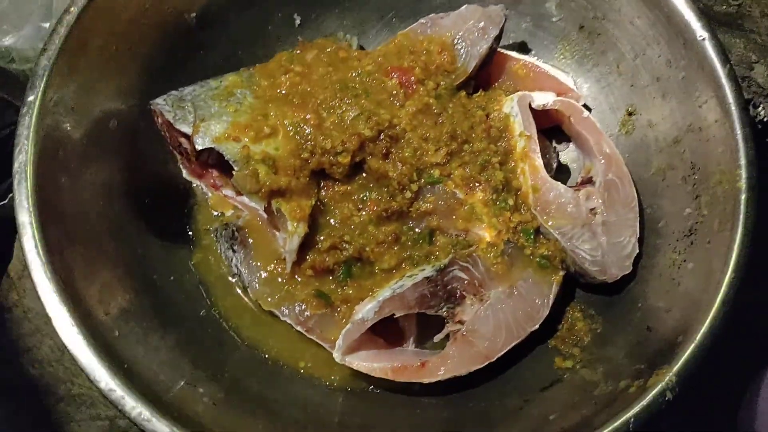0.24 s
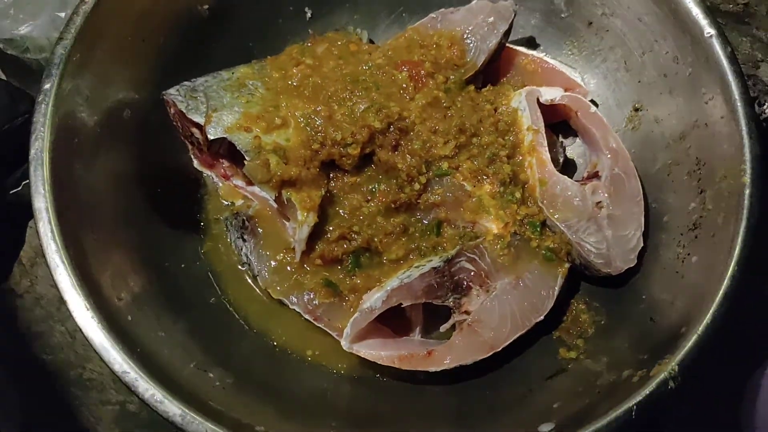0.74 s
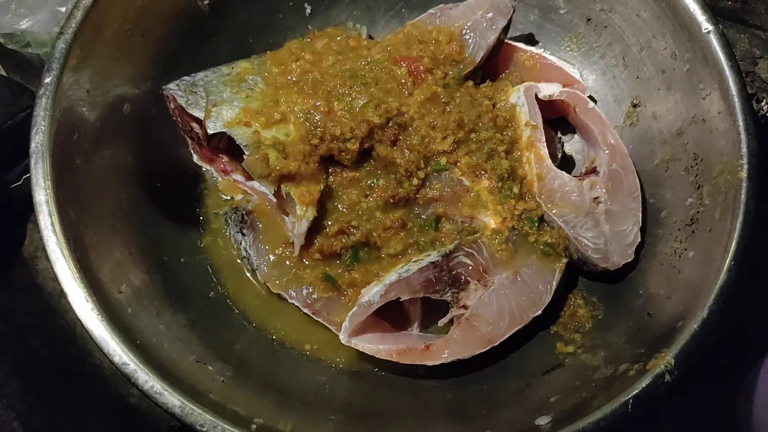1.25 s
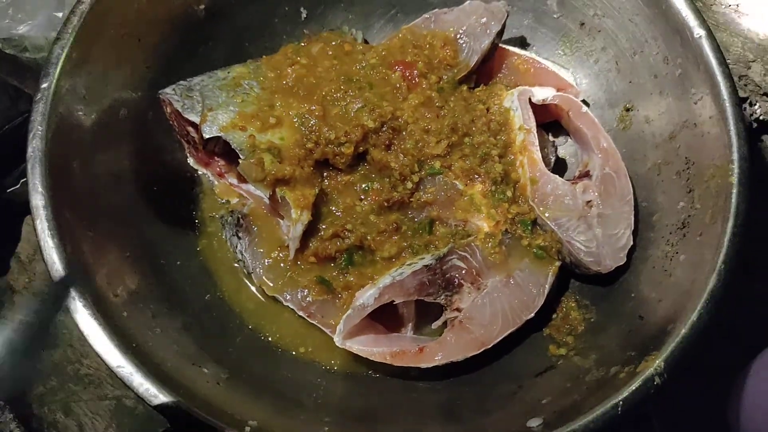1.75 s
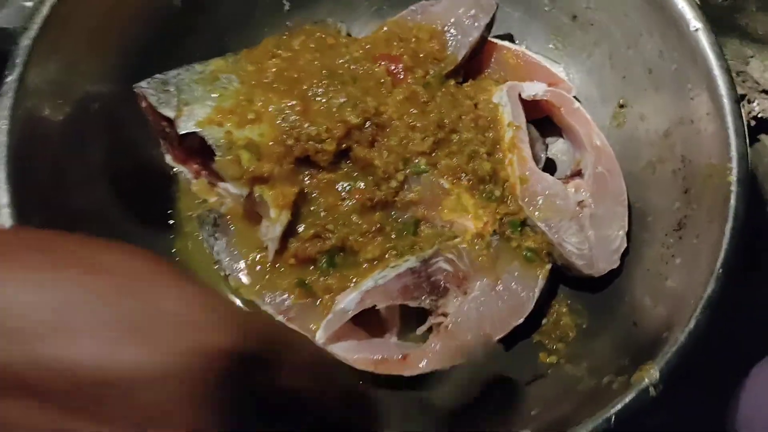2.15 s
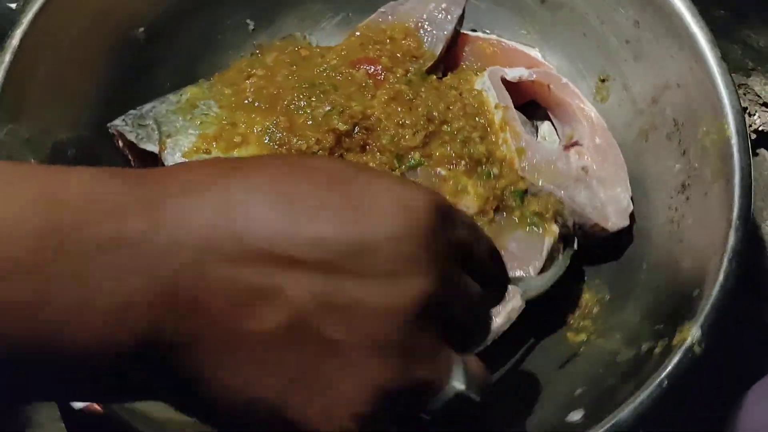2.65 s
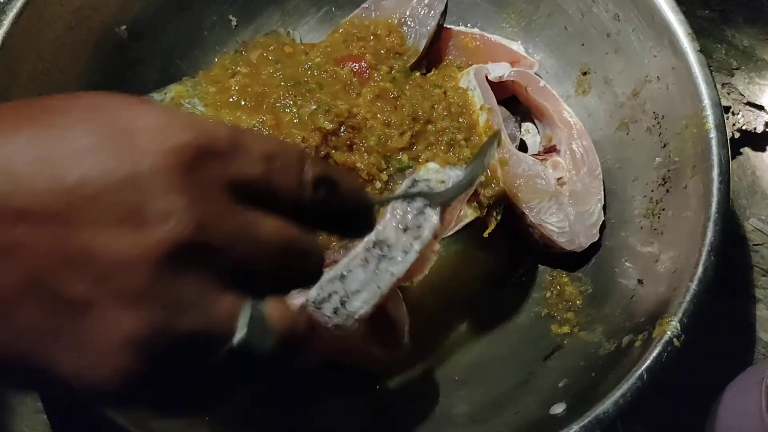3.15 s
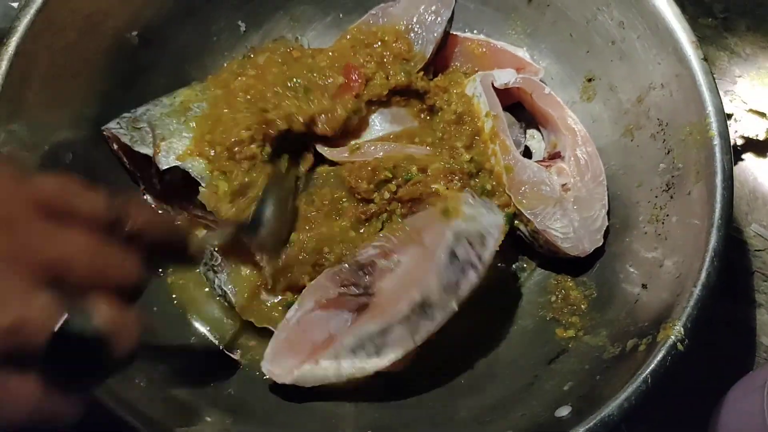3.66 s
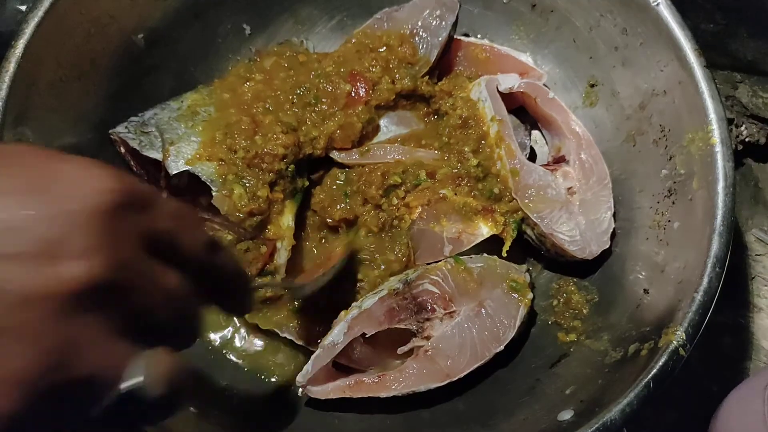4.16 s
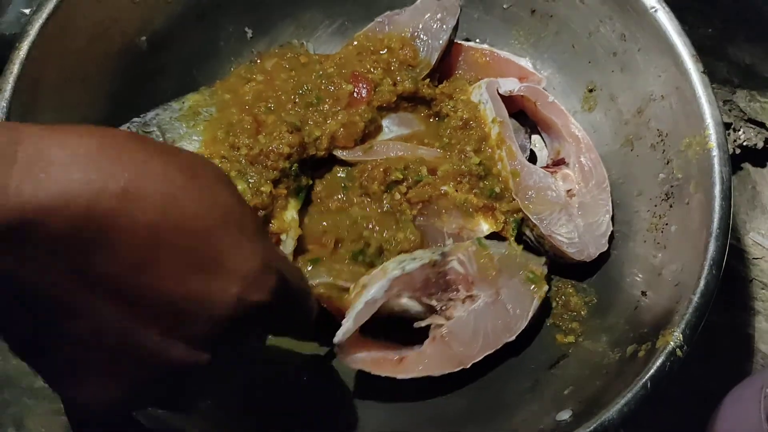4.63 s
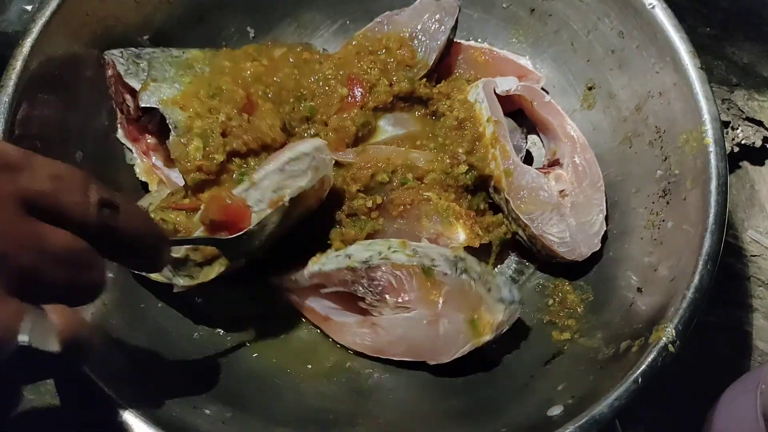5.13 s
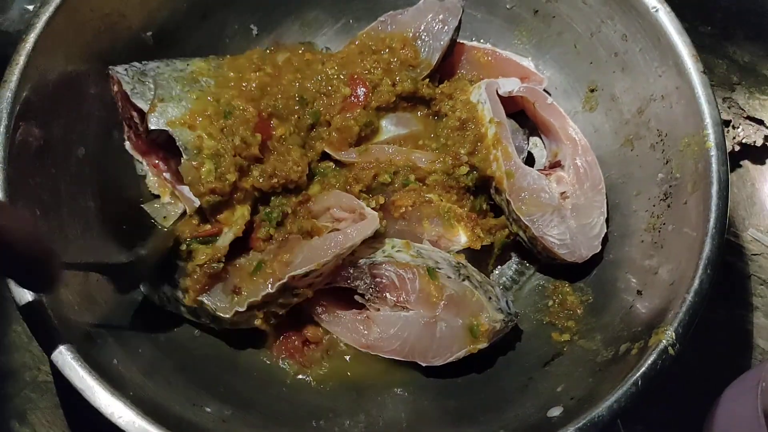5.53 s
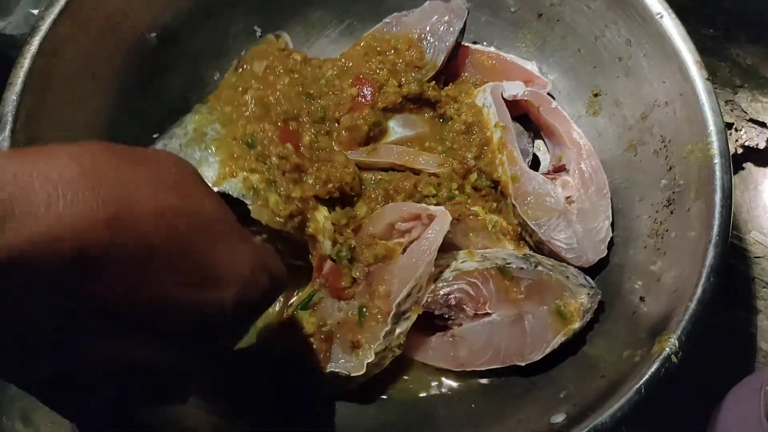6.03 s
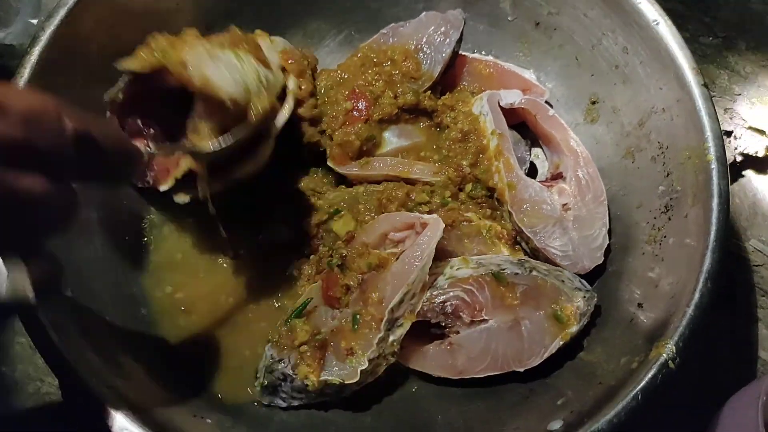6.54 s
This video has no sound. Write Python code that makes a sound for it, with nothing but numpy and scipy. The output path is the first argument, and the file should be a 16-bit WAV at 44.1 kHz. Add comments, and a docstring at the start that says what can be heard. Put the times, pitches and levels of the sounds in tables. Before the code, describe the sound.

A hand-held microphone picks up low muffled bumps and dragging skin, with wet rubbing behind. At about two seconds a spoon knocks sharply on a steel bowl, then slippery slices are turned with squelches, tiny pops and scattered short metallic clanks. Slices settle softly; a loud wet smack comes near the end. Faint outdoor hiss stays underneath.

```python
"""A steel spoon turns fish in wet spice paste inside a steel bowl, close to a hand-held camera outdoors.
Strokes hiss and smack through the paste from the start, over a soft steady outdoor hiss; in the first two
seconds skin drags on the camera and fingers bump it. Then the spoon knocks on the bowl, whose ringing modes
the fish damps, and later slices settle softly. Sticky contacts are noise and snaps; wet pops are rising sines."""
import sys
import numpy as np
from scipy import signal
from scipy.fft import rfft, irfft, next_fast_len
from scipy.io import wavfile
from scipy.ndimage import uniform_filter1d, map_coordinates

SR = 44100
rng = np.random.default_rng(int(sys.argv[2]) if len(sys.argv) > 2 else 0)


def dump(signal):
    """Clip the signal to [-1, 1] and save it as 16-bit WAV at the path in sys.argv[1]."""
    limited = np.clip(np.atleast_2d(signal).T, -1, 1)
    pcm = np.round(limited * 32767).astype(np.int16)
    wavfile.write(sys.argv[1], SR, pcm)


N = 299439  # length in samples

# Levels in the tables are relative: each source sets its final loudness and tone in its function.

# Spoon hitting the bowl: start_s, middle_db, favoured_pitch_hz, low_over_middle_db, high_over_middle_db,
# freedom (share of the bowl's free ring time)
KNOCKS = [(2.0678, -19.5, 1106, 8, 2.5, 0.37), (2.0977, -29, 1190, -20, 3.5, 0.43),
          (2.108, -25, 1960, -7, 5.5, 0.35), (2.154, -37.5, 2110, -35.5, 5.5, 0.49),
          (3.0908, -36, 1980, -47, 5.5, 0.64), (3.6161, -30.5, 2070, -6, -1.5, 0.54),
          (3.666, -33, 1480, -14.5, -1.5, 0.36), (4.1651, -24, 798, 6, 8, 0.72),
          (5.466, -24.5, 1550, -5.5, -2.5, 0.19), (6.5603, -35, 2150, -25.5, 2, 1),
          (6.753, -38, 2300, -4, 11, 0.27)]
# Ringing modes of the loaded bowl: pitch_hz, level_db, ring_s (time to fall 60 dB, before freedom shortens it)
BOWL_MODES = [(608, -16, 0.34), (787, -10.5, 0.081), (923, -3.5, 0.1), (1034, -3.5, 0.041),
              (1195, -13, 0.3), (1280, -3, 0.075), (1486, -4.5, 0.025), (1660, -10.5, 0.11),
              (1978, -3.5, 0.043), (2130, -5.5, 0.097), (2397, -5.5, 0.05), (2570, -7, 0.06),
              (3437, -9.5, 0.033), (3990, -10, 0.017), (4690, -6, 0.09), (4915, -6, 0.06),
              (5500, -7, 0.045), (5800, -9, 0.06), (6220, -5.5, 0.047), (6430, -5.5, 0.06),
              (6710, -12, 0.12)]
# Tone of the heavy bowl giving way under a knock: pitch_hz, level_db
BOWL_THUD = [(60, -17.5), (170, -7.5), (320, 3), (450, -2), (700, -23)]


def spoon():
    """Each knock clacks and rings the bowl; its spot favours some modes, and fish there damps and blurs them."""
    out = np.zeros(N)
    t = np.arange(SR // 3) / SR
    hz, mode_db, ring_s = np.transpose(BOWL_MODES)[:, :, None]
    for start_s, middle_db, favoured_hz, low_db, high_db, freedom in KNOCKS:
        # Modes near the favoured pitch are up to 7 dB stronger, with some random scatter.
        scatter_db = rng.normal(0, 2.5, hz.shape)
        spot_db = 7 * np.exp(-(np.log(hz / favoured_hz) / 0.34) ** 2) + scatter_db
        # A random drift of phase makes each mode less pure.
        drift = np.cumsum(rng.standard_normal((len(hz), len(t))), axis=1)
        blur = drift * np.sqrt(hz / SR) * 0.012
        waves = np.sin(2 * np.pi * (hz * t + blur + rng.random(hz.shape)))
        fading = burst(t, 0.0014, 0.0057, ring_s * np.clip(freedom, 0.1, 1))
        ring = unit((amp(mode_db + spot_db) * waves * fading).sum(0))

        hard = clack(t, count=70)
        noise = unit(colour(rng.standard_normal(len(t)), CONTACT_TONE))
        contact = unit((hard + amp(-4) * noise) * burst(t, 0.0006, 0.0071, 0.045))
        levels_db = middle_db + np.array([low_db, 0, high_db])
        knock = voiced(ring + amp(-5) * contact, levels_db)

        thud = unit(colour(rng.standard_normal(len(t)), BOWL_THUD)) * burst(t, 0.0015, 0.004, 0.23)
        thud_db = middle_db + low_db - 25.5  # set from the knock's low register
        add(out, start_s, amp(-12.5) * (knock + amp(thud_db) * thud))
    return colour(out, [(60, -22.5), (200, 1.5), (350, -1.5), (1000, 0)])


# Tone of hard or sticky contacts, shared by knocks and smacks: pitch_hz, level_db
CONTACT_TONE = [(100, -67), (300, -9.5), (600, -3.5), (1100, -7.5), (2200, 1.5), (3000, -0.5), (5000, -5),
                (7000, 7), (8200, -14)]


def clack(t, count):
    """Many partials of uneven strength, drawn anew for every contact."""
    hz = rng.uniform(np.sqrt(350), np.sqrt(8000), (count, 1)) ** 2
    size = shape(CONTACT_TONE, hz) * hz ** 0.25 * amp(rng.normal(0, 3, hz.shape))
    waves = np.sin(2 * np.pi * (hz * t + rng.random(hz.shape)))
    return unit((size * waves).sum(0))


STROKE_RANGE_DB = 20  # drop over one swell or fade time
# Spoon strokes through the paste: firmest_push_s, level_db, swell_s, fade_s, hiss_over_body_db
STROKES = [(0.01, -65, 0.09, 0.45, 7.5), (0.62, -44, 0.23, 0.19, 1.5), (0.88, -43, 0.16, 0.17, 1),
           (1.05, -47.5, 0.22, 0.3, -0.5), (1.4, -55.5, 0.16, 0.21, 7), (1.66, -64, 0.9, 0.95, -28.5),
           (2.01, -57, 0.25, 0.6, -1), (2.191, -52, 0.12, 0.56, 3), (2.47, -57, 0.3, 0.49, -5),
           (2.822, -61, 0.23, 0.31, 6.5), (3.452, -60.5, 0.45, 0.1, -1), (3.65, -56, 0.3, 0.57, 1),
           (4.09, -64.5, 0.077, 0.17, 7.5), (4.2, -47, 0.01, 0.28, 2.5), (4.38, -49, 0.25, 0.24, -31),
           (5.17, -56.5, 0.58, 0.72, 2.5), (5.5, -50.5, 0.067, 0.29, 1.5), (5.66, -49, 0.11, 0.21, 2.5),
           (5.85, -60.5, 0.6, 0.97, -9.5), (6.251, -66, 1, 0.74, 6.5), (6.64, -48.5, 0.04, 0.18, -11.5)]


def strokes():
    """Body and hiss level in dB: each stroke swells to its firmest push and fades by the stroke range."""
    t = np.arange(N) / SR
    body, hiss = np.full(N, 1e-10), np.full(N, 1e-10)
    for push_s, level_db, swell_s, fade_s, hiss_db in STROKES:
        distance = np.maximum((push_s - t) / swell_s, (t - push_s) / fade_s)
        power = amp(level_db - STROKE_RANGE_DB * np.minimum(distance, 10)) ** 2
        body += power
        hiss += power * amp(hiss_db) ** 2
    return 10 * np.log10(body), 10 * np.log10(hiss)


# The lows thin out in quiet moments: a lower edge moves up as the level falls.
EDGE_HZ, EDGE_AT_DB, EDGE_DB_PER_OCTAVE = 622, -59.5, 10
# Tone of wet rubbing as the bowl colours it: pitch_hz, level_db
PASTE_TONE = [(250, -8), (500, -6), (900, 2), (1250, -0.5), (1600, 2.5), (2300, 3), (3500, 1), (4400, -8),
              (5300, -7.5), (6100, -4.5), (6750, 1), (7150, -6), (7600, -11.5), (8400, -26)]


def sliding(body_db, hiss_db):
    """Sliding surfaces hiss with tiny sticky snaps and small bubbles; the lows thin out in quiet moments."""
    snaps = amp(2 * wobble(70)) * crackle(rate=700, spread_db=3)
    froth = bubbles(rate=200, centre_hz=1585, spread=0.79, cycles=18)
    grain = amp(1.8 * wobble(35))
    rub = grain * (rng.standard_normal(N) + amp(-6) * snaps) + amp(-10.5) * froth
    rub = unit(patchy(rub, depth_db=1.8))
    bowl_song = unit(singing(rng.standard_normal(N), width_hz=29))
    wet = colour(rub + amp(-16.5) * bowl_song, PASTE_TONE)

    # The body lies below the upper split; the hiss is what remains above it.
    body = filtered(wet, lambda hz: 1 / (1 + (hz / HIGH_SPLIT_HZ) ** 16))
    hiss = unit(wet - body)
    edge_hz = EDGE_HZ * 2 ** ((EDGE_AT_DB - body_db) / EDGE_DB_PER_OCTAVE)
    return amp(body_db + 1) * above_edge(unit(body), edge_hz) + amp(hiss_db - 2.23) * hiss


def bubbles(rate, centre_hz, spread, cycles):
    """Small air pockets open at random, rate a second; each rings for some cycles with a rising pitch."""
    count = int(rate * N / SR)
    hz = np.clip(centre_hz * np.exp(spread * rng.standard_normal((count, 1))), 250, 8000)
    size = amp(6.1 * np.minimum(rng.exponential(size=(count, 1)), 2.5))
    n = np.arange(SR // 25)
    age = hz * n / SR / cycles  # 1 when the bubble has fallen by 60 dB
    envelope = (1 - np.exp(-12 * age)) * amp(-60 * age)
    pops = size * envelope * np.sin(2 * np.pi * cycles * (age + 0.027 * age ** 2))
    starts = rng.integers(0, N, (count, 1))
    return unit(np.bincount((starts + n).ravel(), pops.ravel(), N)[:N])


def singing(x, width_hz):
    """The damped bowl answers a scrape at its own modes."""
    def response(f):
        total = 0
        for mode_hz, db, ring_s in BOWL_MODES:
            damping = 1j * f * width_hz
            total = total + amp(db) * np.sqrt(ring_s) * damping / (mode_hz ** 2 - f * f + damping)
        return total
    return filtered(x, response)


def above_edge(x, edge_hz):
    """Keep what lies above a moving lower edge."""
    hz, s, z = signal.stft(x, SR, nperseg=1024)
    edge = np.interp(s, np.arange(N) / SR, edge_hz)
    gain = 1 / (1 + (edge / (hz[:, None] + 1)) ** 7)
    return signal.istft(z * gain, SR, nperseg=1024)[1][:N]


def patchy(x, depth_db):
    """Random patches of gain over pitch and time make the rubbing hiss uneven."""
    z = signal.stft(x, SR, nperseg=512)[2]
    field = uniform_filter1d(rng.standard_normal(z.shape), size=6, axis=0)  # smooth over pitch
    field = uniform_filter1d(field, size=5, axis=1)  # smooth over time
    return signal.istft(z * amp(depth_db * unit(field)), SR, nperseg=512)[1][:N]


CAVITY_DB, CAVITY_PER_HIGH = -8, 0.45  # cavity over tearing; the duller the smack, the more it is a pure pop
# Low over middle: larger, lower-pitched cavities carry more of it.
LOW_DB, LOW_AT_HZ, LOW_DB_PER_OCTAVE = -14.5, 1436, 15
# Paste letting go of fish and spoon: start_s, middle_db, cavity_pitch_hz, high_over_middle_db
SMACKS = [(0.0648, -50.5, 1390, 7.5), (0.2668, -50, 2020, 5.5), (0.7627, -38.5, 2010, -15),
          (2.4788, -39, 1193, -16), (2.5272, -37, 1780, -5.5), (2.6244, -48.5, 1130, -16.5),
          (3.1193, -49, 1870, 6), (3.3492, -56.5, 1390, -19), (3.4284, -50, 1380, 11),
          (3.7599, -42.5, 985, 2), (3.8551, -48.5, 1790, 4.5), (3.8886, -47, 1330, -7),
          (4.37, -42, 2150, -14), (4.3894, -41.5, 1620, -0.5), (4.4887, -44, 2330, -16),
          (4.585, -43, 2130, -30), (4.7874, -50, 2750, 7), (4.8184, -41, 1764, -0.5),
          (4.8354, -40.5, 3200, -2), (4.9287, -58, 1610, 13.5), (5.1562, -37.5, 1225, -8),
          (5.231, -40.5, 1690, -5), (5.7204, -39, 1020, -1.5), (6.1464, -42, 960, -23),
          (6.153, -44.5, 2380, -28), (6.166, -41.5, 2850, -5), (6.2484, -59.5, 3120, 14.5),
          (6.5922, -36, 2265, -15), (6.6084, -27, 1780, -2), (6.6164, -23.5, 1140, -3.5),
          (6.6314, -48, 1400, 17.5), (6.6553, -35.5, 2050, -21), (6.7181, -40.5, 2160, -14)]


def smacks(body_db):
    """A wet film tears in a spray of snaps and opens a small, quivering cavity whose pitch rises."""
    out = np.zeros(N)
    t = np.arange(SR // 8) / SR
    for start_s, middle_db, cavity_hz, high_db in list(SMACKS) + small_smacks(body_db):
        cavity_db = CAVITY_DB - CAVITY_PER_HIGH * high_db
        low_db = LOW_DB - LOW_DB_PER_OCTAVE * np.log2(cavity_hz / LOW_AT_HZ)

        noise = rng.standard_normal(len(t))
        uneven = amp(11 * rng.standard_normal(len(t)))
        snaps = unit(colour(noise * uneven, CONTACT_TONE))
        tear = unit((amp(-5.5) * snaps + clack(t, count=45)) * burst(t, 0.003, 0.0035, 0.042))

        quiver = np.cumsum(rng.standard_normal(len(t))) * np.sqrt(cavity_hz / SR) * 0.055
        # The pitch starts a little under the cavity's own and rises; quiver is added in cycles.
        cycles = cavity_hz * (0.92 * t + 8 * t ** 2) + quiver
        pop = unit(np.sin(2 * np.pi * cycles) * burst(t, 0.0015, 0.00083, 0.016))

        levels_db = middle_db + np.array([low_db, 0, high_db])
        add(out, start_s, amp(-11) * voiced(tear + amp(cavity_db) * pop, levels_db))
    return colour(out, [(100, -25), (300, -17), (700, 7), (2000, -1.5)])


SMALL_RATE = 6  # small smacks a second
SMALL_OVER_DB, SMALL_FOLLOWS = 6, 0.44  # dB over the mean stroke; share of stroke level changes followed
SMALL_HZ, SMALL_HIGH_DB = 1800, -11  # middle of the random cavity pitch and of high over middle


def small_smacks(body_db):
    """Faint smacks at random moments, stronger where the stroke is firm."""
    chance = rng.random((N // 1000, 4))[:int(SMALL_RATE * N / SR)]
    mean_db = body_db.mean()
    level_db = mean_db + SMALL_OVER_DB + SMALL_FOLLOWS * (body_db - mean_db)
    events = []
    for when, size, pitch, bright in chance:
        middle_db = level_db[int(when * N)] + 6 * (size - 0.5)
        cavity_hz = SMALL_HZ * 2 ** (1.5 * (pitch - 0.5))
        high_db = SMALL_HIGH_DB + 24 * (bright - 0.5)
        events.append((when * N / SR, middle_db, cavity_hz, high_db))
    return events


RUB_RISE_S, RUB_T60_S = 0.029, 0.54  # the skin takes hold, then comes to rest
# Skin dragging on the camera: start_s, length_s, level_db
RUBS = [(0.532, 0.098, -43.5), (0.781, 0.16, -45.5), (0.89, 0.024, -47), (0.965, 0.061, -44.5),
        (1.066, 0.031, -41), (1.23, 0.17, -55.5), (1.555, 0.27, -49.5), (1.885, 0.044, -69),
        (2.032, 0.013, -51.5)]
# Fingers bumping the camera: start_s, low_db, thud_pitch_hz, middle_over_low_db, high_over_low_db
BUMPS = [(0.547, -25.5, 307, 3, -12.5), (0.575, -26.5, 277, -14, -29), (0.901, -17, 212, -6.5, -21),
         (0.917, -23, 170, -9, -35), (1.014, -28, 182, -10.5, -23.5), (1.05, -32.5, 285, -2, 0),
         (1.114, -26.5, 266, -19, -17.5), (1.324, -45, 270, -8.5, -9), (1.815, -36.5, 314, -28, -20.5)]


def grip():
    """Skin sticks and slips on the camera; fingers bump it with a sagging thud and a scuff."""
    drag_power = np.zeros(N)
    t = np.arange(SR) / SR
    for start_s, length_s, level_db in RUBS:
        add(drag_power, start_s, (amp(level_db) * burst(t, RUB_RISE_S, length_s, RUB_T60_S)) ** 2)
    lumps = amp(2.6 * wobble(45))
    stick_slip = case(crackle(rate=350, spread_db=-0.5), ring=2.2)
    out = np.sqrt(drag_power) * lumps * amp(1) * stick_slip

    t = np.arange(SR // 4) / SR
    for start_s, low_db, thud_hz, middle_db, high_db in BUMPS:
        sag = np.sin(2 * np.pi * thud_hz * (t - 1.4 * t ** 2))  # pitch falls from thud_hz
        thud = case(rng.standard_normal(len(t)), ring=3.2) + amp(-4) * sag
        thud = thud * burst(t, 0.0005, 0.015, 0.063)
        scuff = unit(clack(t, count=120) * amp(3.3 * wobble(500)[:len(t)]))
        scuff = scuff * burst(t, 0.00037, 0.0031, 0.073)
        levels_db = low_db + np.array([0, middle_db, high_db])
        add(out, start_s, amp(-9) * voiced(thud + amp(6) * scuff, levels_db))
    return colour(out, [(30, -23.5), (70, -14), (130, -6), (300, 0.5), (600, -1), (1200, -0.5)])


# Resonances of the camera body: pitch_hz, width_hz, level_db (before the ring amount scales them)
CASE_MODES = [(269, 64, 1.5), (446, 14, -9), (668, 9, 7), (810, 330, -3.5), (1390, 29, -2)]
# Tone of skin against the camera: pitch_hz, level_db
SKIN_TONE = [(18, -60.5), (30, -17), (108, 6), (270, -7.5), (397, -11), (441, -8), (545, -9.5),
             (661, -10.5), (939, -17.5), (1010, -34), (2000, -16), (2600, -47.5), (4400, -120)]


def case(x, ring):
    """Sound conducted from the skin through the resonant camera body."""
    def response(f):
        modes = 0
        for mode_hz, width_hz, db in CASE_MODES:
            damping = 1j * f * width_hz
            modes = modes + amp(db) * damping / (mode_hz ** 2 - f * f + damping)
        return 1 + ring * modes
    return unit(filtered(colour(x, SKIN_TONE), response))


# Soft weight of fish settling: start_s, peak_db (before a 5 dB lift)
FLOPS = [(3.624, -61.5), (4.547, -66), (5.677, -80), (5.758, -67), (6.611, -51), (6.653, -49.5)]


def flops():
    """A slice settles on the bowl with a faint dull push of low noise."""
    out = np.zeros(N)
    t = np.arange(SR // 4) / SR
    dull_tone = [(30, -23), (80, 4), (140, 4.5), (280, -5), (600, -21)]
    for start_s, peak_db in FLOPS:
        push = colour(rng.standard_normal(len(t)), dull_tone) * burst(t, 0.0043, 0.014, 0.18)
        add(out, start_s, amp(peak_db + 5) * push / np.abs(push).max())
    return out


def surroundings(x, t60):
    """The bowl's wall and nearby surfaces return a faint diffuse tail."""
    t = np.arange(SR) / SR
    tail = colour(rng.standard_normal(SR), [(100, -4), (500, -2), (1500, -1), (7000, 2)])
    tail = tail * burst(t, 0.0075, 0.01, t60)
    return signal.fftconvolve(x, tail / np.linalg.norm(tail))[:N]


# Tone of the outdoor hiss: pitch_hz, level_db
AIR_TONE = [(20, -24.5), (40, -14), (90, -8.5), (200, -19.5), (600, -23.5), (1100, -19.5), (1600, -10.5),
            (2600, -2), (3600, -10), (4500, -14), (5600, -9), (6660, 2), (7200, -22), (7700, -31)]


def air():
    """Faint steady outdoor hiss made of coloured noise."""
    return amp(-67.5) * unit(colour(rng.standard_normal(N), AIR_TONE))


def amp(db):
    """Decibels to gain."""
    return 10 ** (np.asarray(db) / 20)


def unit(x):
    """Scale to rms 1."""
    return x / np.sqrt(np.mean(x ** 2) + 1e-20)


def wobble(rate):
    """A smooth random curve, rate knots a second."""
    knots = rng.standard_normal(int(N * rate / SR) + 4)
    return map_coordinates(knots, [np.arange(N) * rate / SR])


def crackle(rate, spread_db):
    """Random tiny snaps of uneven size, rate a second."""
    size = amp(spread_db * np.minimum(rng.exponential(size=N), 3))
    return unit((rng.random(N) < rate / SR) * size * rng.choice([-1, 1], N))


def burst(t, rise, hold, t60):
    """An envelope that swells, lasts as long as the contact and dies (all in seconds)."""
    return (1 - np.exp(-t / rise)) * amp(-60 * np.maximum(t - hold, 0) / t60)


def shape(points, hz):
    """Gain of (Hz, dB) points on a log axis."""
    f, db = np.transpose(points)
    return amp(np.interp(np.log(hz + 1), np.log(f + 1), db))


def filtered(x, response):
    """Multiply the spectrum of x by a response of frequency."""
    m = next_fast_len(len(x) + 4096)
    return irfft(rfft(x, m) * response(np.fft.rfftfreq(m, 1 / SR)), m)[:len(x)]


def colour(x, points):
    """Shape the spectrum of x by the (Hz, dB) points."""
    return filtered(x, lambda hz: shape(points, hz))


LOW_SPLIT_HZ, HIGH_SPLIT_HZ = 1400, 4000  # borders of the low, middle and high registers


def registers(x):
    """The low, middle and high parts of x."""
    edges = [(LOW_SPLIT_HZ, "low"), ((LOW_SPLIT_HZ, HIGH_SPLIT_HZ), "band"), (HIGH_SPLIT_HZ, "high")]
    return [signal.sosfilt(signal.butter(4, hz, kind, fs=SR, output="sos"), x) for hz, kind in edges]


def voiced(x, levels_db):
    """Give the first 20 ms of a blow its level in each register."""
    return sum(amp(db) * part / np.std(part[:SR // 50]) for db, part in zip(levels_db, registers(x)))


def add(track, start_s, x):
    """Mix x into the track at start_s seconds."""
    part = track[max(round(start_s * SR), 0):][:len(x)]
    part += x[:len(part)]


def scene():
    """All sources, close and in mono; only knocks and smacks get the diffuse tail."""
    body_db, hiss_db = strokes()
    knocks = spoon()
    handling = flops() + grip() + sliding(body_db, hiss_db) + air()
    contacts = knocks + smacks(body_db)
    return (contacts + amp(-14.5) * surroundings(contacts, t60=0.2) + handling)[None]


TOP_HZ = 8500  # band limit


def record(dry):
    """The microphone rolls off in the top treble and cuts steeply at its band limit."""
    dull = colour(dry[0], [(20, -0.5), (7100, 0), (7700, -6), (8400, -11.5)])
    return filtered(dull, lambda hz: 1 / (1 + (hz / TOP_HZ) ** 120))[None]


dry = scene()
out = record(dry)
dump(out)
```